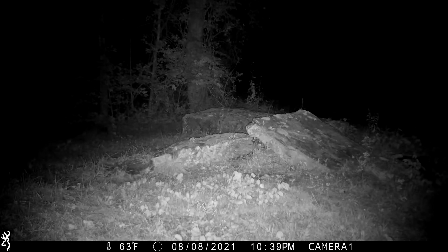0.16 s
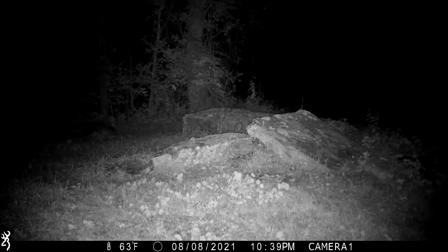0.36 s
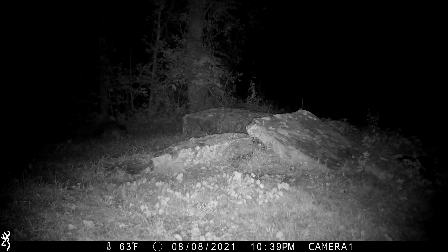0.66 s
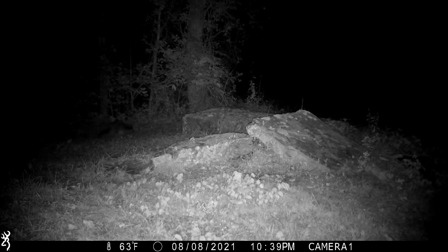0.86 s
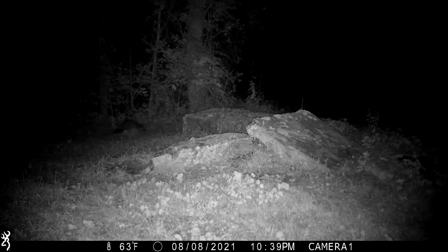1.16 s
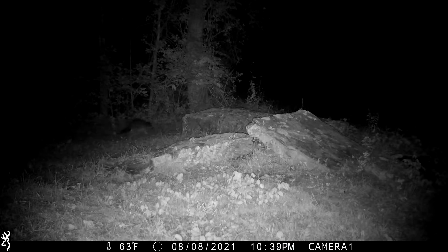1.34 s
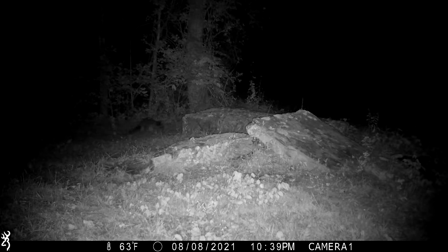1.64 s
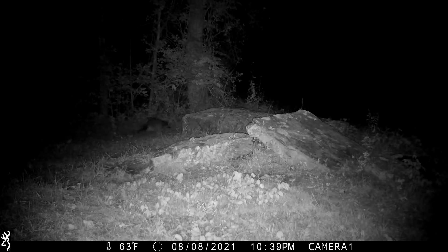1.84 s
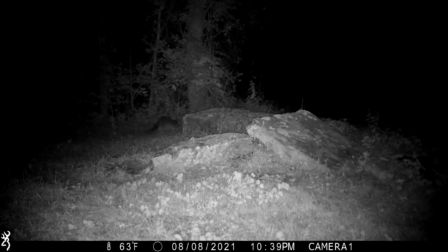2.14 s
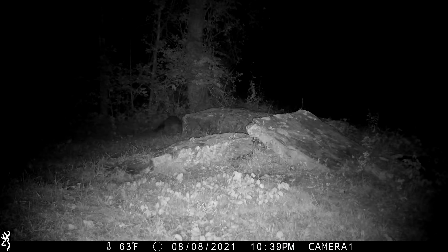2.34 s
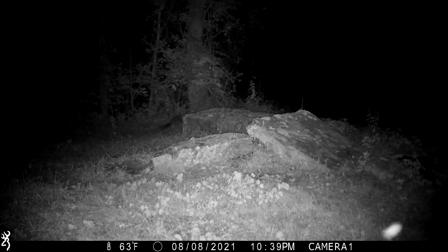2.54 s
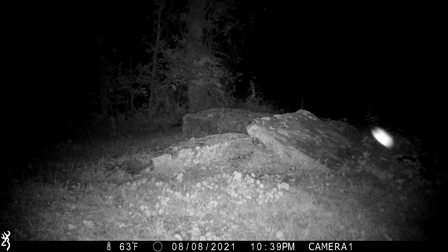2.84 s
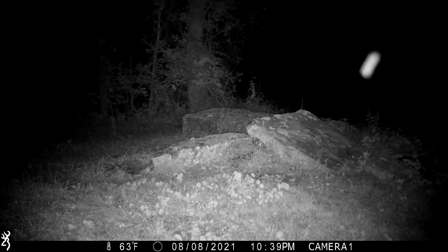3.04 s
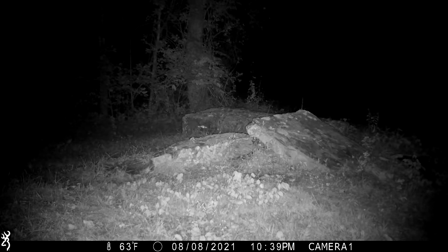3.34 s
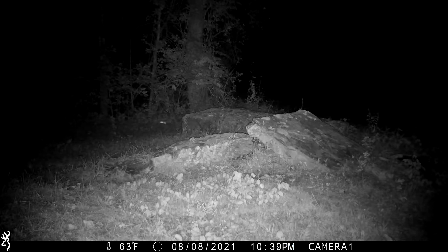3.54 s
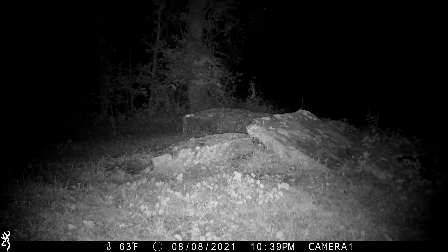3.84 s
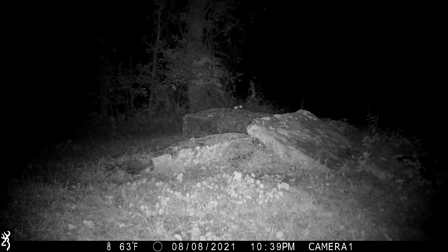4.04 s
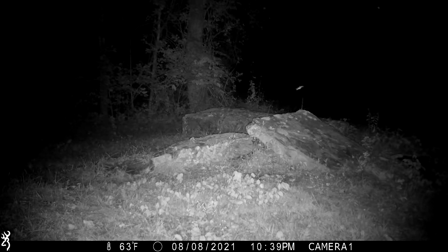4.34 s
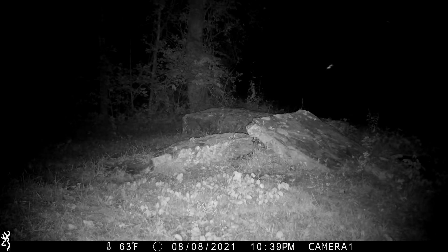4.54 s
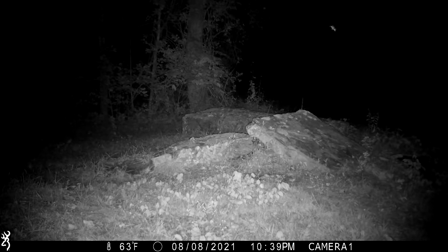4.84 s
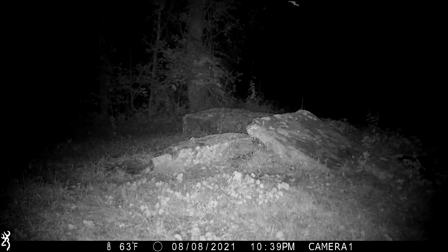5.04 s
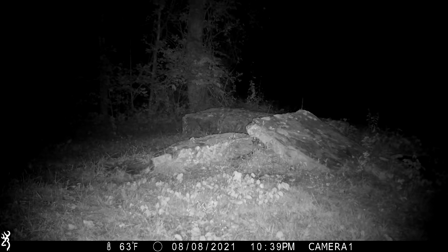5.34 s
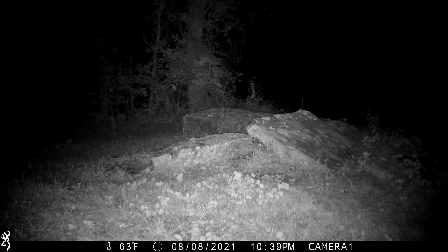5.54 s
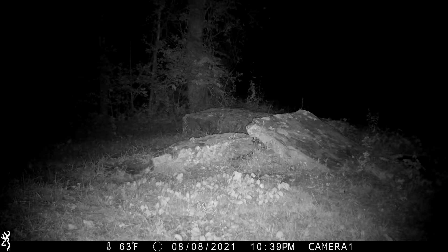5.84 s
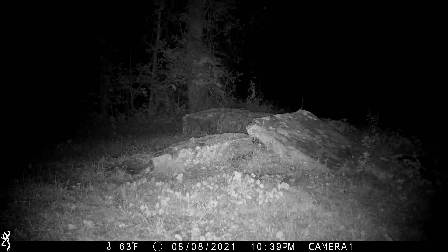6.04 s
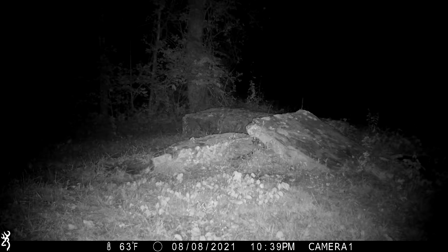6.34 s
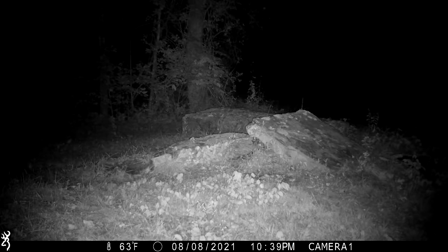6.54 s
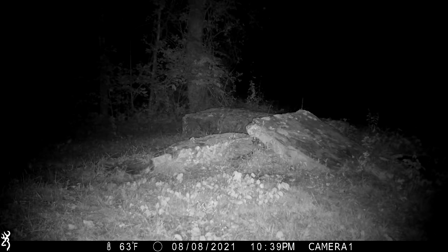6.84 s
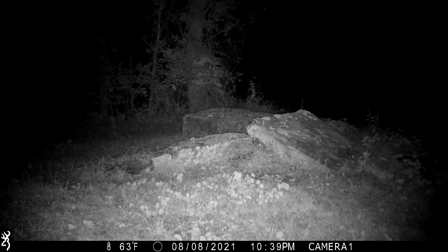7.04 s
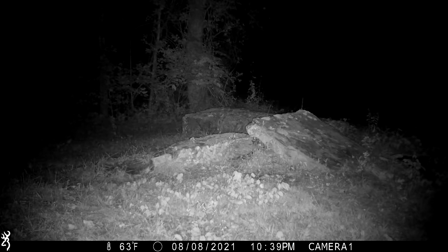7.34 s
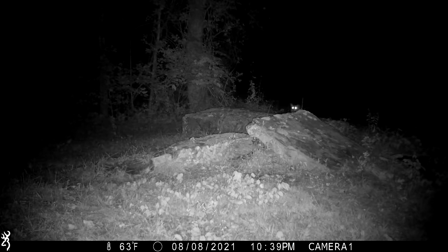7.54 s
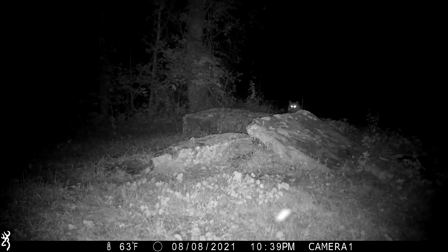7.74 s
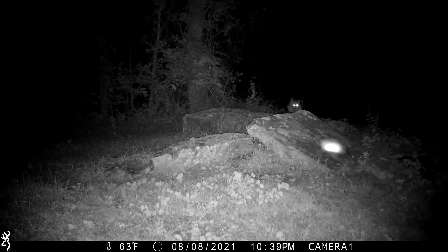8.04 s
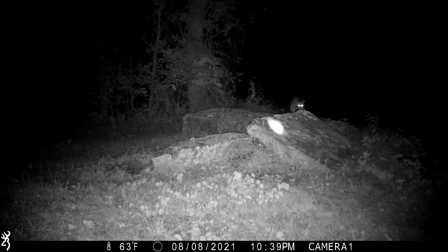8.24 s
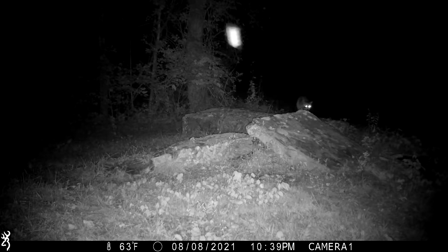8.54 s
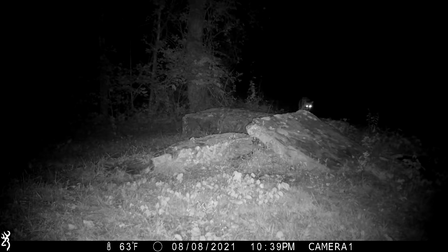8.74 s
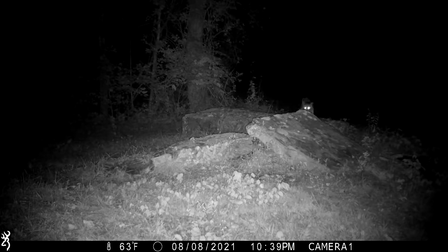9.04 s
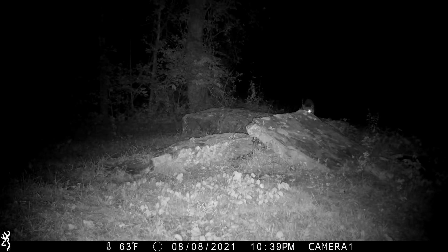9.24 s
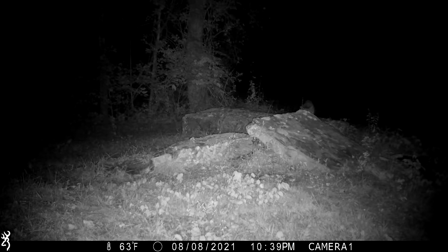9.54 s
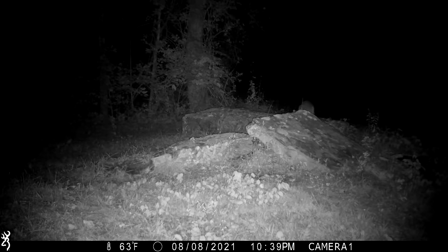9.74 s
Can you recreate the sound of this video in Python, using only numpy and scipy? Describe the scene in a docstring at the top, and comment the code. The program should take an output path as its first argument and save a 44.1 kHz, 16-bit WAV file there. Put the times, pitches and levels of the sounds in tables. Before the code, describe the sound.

Crowds of katydids rasp in pulsing waves through a dark summer wood, over steady tree cricket trills and soft microphone hiss.

```python
"""A summer night in a wood, heard by a small trail camera.
From the start, crowds of katydids rasp in the treetops in waves, about five in four seconds.
A few nearer ones stand out in short runs of rasps, made of clicks as a wing scrapes along a file.
Tree crickets trill steadily beneath, as short tones that sag in pitch; the camera hisses and faintly whines.
From 1.6 s one distant cricket comes forward in bouts, as a thin, wavering note."""
import sys
import numpy as np
from scipy import signal
from scipy.fft import rfft, irfft, next_fast_len
from scipy.io import wavfile
from scipy.ndimage import map_coordinates

SR = 44100
rng = np.random.default_rng(int(sys.argv[2]) if len(sys.argv) > 2 else 0)


def to_wav(s):
    """Save 16-bit WAV."""
    ch = np.atleast_2d(s).T  # columns
    pcm = np.round(np.clip(ch, -1, 1) * 32767)  # PCM
    wavfile.write(sys.argv[1], SR, pcm.astype(np.int16))


N = 436149
TIME = np.arange(N) / SR  # seconds


def chorus():
    """Two crowds of katydids swell and sink together, blurred by the wood; the far one is duller."""
    # how strong each pitch is in the near and the far crowd: (frequency [Hz], level per Hz [dB])
    near_colour = [(1100, -40.5), (1450, -14), (2100, -4), (2550, -5), (3100, 1.5), (3400, -1.5),
                   (3900, -10), (4400, -9.5), (4850, -8.5), (5350, -12.5), (6000, -26), (6500, -36.5),
                   (7100, -50), (8000, -84)]
    far_colour = [(1000, -50), (1250, -21.5), (1500, -11.5), (1750, -10.5), (2000, -0.5), (2250, 0.5),
                  (2550, -3.5), (2900, -8.5), (3400, -13), (3900, -20), (5000, -16), (6000, -34),
                  (7000, -69)]

    near = katydids(count=700, rasps_per_s=7.8, length=.07, teeth_per_s=520, spread_db=6.5)
    far = katydids(count=800, rasps_per_s=9, length=.07, teeth_per_s=480, spread_db=5.0)

    near = unit(colour(woods(near, wet=1.6, t60=.45), near_colour))
    far = unit(colour(woods(far, wet=2, t60=.35), far_colour))

    near = near * level(lull_db=-47.5, wave_db=0, lag=0)
    far = far * level(lull_db=-44.5, wave_db=-1.0, lag=.02)  # weaker, later waves
    return wings(near + far, depth_db=1.0, width_hz=35, hold=.3)


def katydids(count, rasps_per_s, length, teeth_per_s, spread_db):
    """A crowd of callers take turns, each giving a run of three rasps at its own pace and distance."""
    clicks = np.zeros(N)
    for turn, (delay, pace, teeth, nearness) in enumerate(rng.random((count, 4))):
        start = (turn + delay) / count * (N / SR + 1) - .5  # some turns begin before the scene does
        gap = 1 / (rasps_per_s * (.85 + .3 * pace))
        own_teeth_per_s = teeth_per_s * (.7 + .6 * teeth)
        gain = amp(spread_db * nearness)
        for k in range(3):
            at, size = rasp(clicks, start + k * gap, length, own_teeth_per_s, gain)
            clicks[at] += size
    return clicks


def rasp(track, middle, length, teeth_per_s, gain):
    """One wing stroke: a scraper clicks along the file; returns the click places and sizes."""
    tooth_gaps = 1 + .15 * rng.standard_normal(128)  # slightly uneven teeth
    since_start = np.cumsum(tooth_gaps) / teeth_per_s

    # the stroke swells and fades; clicks that come less often are made bigger
    swell = np.sqrt(np.sin(np.pi * np.clip(since_start / length, 0, 1)).clip(0))
    size = swell * np.sqrt(SR / teeth_per_s)

    at = np.round((middle - length / 2 + since_start) * SR).astype(int)
    inside = (at >= 0) * (at < len(track))
    return at.clip(0, len(track) - 1), gain * size * inside


def level(lull_db, wave_db, lag):
    """A crowd's gain at every sample: some always call, and the rest join in and drop out with each wave."""
    # waves of the katydid chorus: (time of the crest [s], length [s], level [dB])
    waves = [(.12, 1.4, -42.5), (1.08, 1.15, -42.5), (1.84, 0.92, -42.5), (2.652, 0.81, -41.5),
             (3.49, 0.78, -41), (4.272, 0.8, -41.5), (5.06, 1.04, -43.5), (5.743, 0.87, -43.5),
             (6.41, 0.92, -42), (7.12, 1.15, -45), (7.9, 1.36, -43), (8.677, 0.88, -41), (9.58, 1.9, -44)]

    power = np.full(N, amp(lull_db) ** 2)
    for crest, length, db in waves:
        phase = np.clip((TIME - crest - lag) / length, -.5, .5)
        power += (amp(db + wave_db) * np.cos(np.pi * phase)) ** 2
    return np.sqrt(power)


def near_katydids():
    """The closest callers, whose single rasps can be told apart."""
    # runs of evenly spaced rasps: (time of first rasp [s], rasps [count], time between rasps [s], level [dB])
    runs = [(.095, 1, .12, -44), (.877, 3, .12, -45.5), (1.745, 3, .141, -49), (2.89, 4, .119, -42),
            (4.825, 3, .112, -41), (5.374, 3, .109, -43), (6.408, 2, .193, -43.5), (6.758, 3, .126, -43),
            (7.276, 2, .115, -46), (7.778, 2, .119, -46.5), (8.093, 3, .119, -46), (9.287, 1, .12, -46),
            (9.595, 3, .12, -47)]
    # how strong each pitch is in a near rasp: (frequency [Hz], level per Hz [dB])
    rasp_colour = [(1100, -40.5), (1500, -9.5), (1800, -6), (2150, -1), (2600, -1.5), (3200, -1),
                   (3900, -7.5), (4850, -8.5), (5400, -16.5), (6000, -23), (7100, -51.5), (8000, -86.5)]
    length_s, mean_teeth_per_s = .065, 600
    lead_s = .008  # a stroke peaks slightly before its echoes do

    clicks = np.zeros(N)
    for (first, count, gap, db), teeth in zip(runs, rng.uniform(.8, 1.2, len(runs))):
        for k in range(round(count)):
            middle = first + k * gap - lead_s
            at, size = rasp(clicks, middle, length_s, mean_teeth_per_s * teeth, amp(db))
            clicks[at] += size
    return colour(woods(clicks, wet=1.0, t60=0.14), rasp_colour)


def woods(clicks, wet, t60):
    """Direct clicks plus their echoes; every caller has its own paths among the trunks, so they merge into a haze."""
    keep = amp(-120 / (t60 * SR))  # share of the echo energy left after one sample: 60 dB down in t60 seconds
    already_ringing = [np.mean(clicks ** 2)]
    energy = signal.lfilter([1 - keep], [1, -keep], clicks ** 2, zi=already_ringing)[0]
    haze = np.sqrt(energy) * rng.standard_normal(N)
    return (clicks + wet * haze) / np.sqrt(1 + wet ** 2)


def wings(x, depth_db, width_hz, hold):
    """Each caller's wings ring at their own narrow pitches, which stand out for the length of its call."""
    hz, t, spectrum = signal.stft(x, SR, nperseg=2048)
    field = rng.standard_normal((1024, 256))  # chance boosts and cuts over pitch and time
    places = np.meshgrid(hz / width_hz, t / hold, indexing="ij")
    rings = map_coordinates(field, places, order=1, mode="wrap")
    return signal.istft(spectrum * amp(depth_db * unit(rings)), SR, nperseg=2048)[1][:N]


def tree_crickets():
    """Each wing stroke is a short tone that sags in pitch; the strokes run on as a trill."""
    # one row a cricket, each value wavering a little: (pitch [Hz], wing strokes [per s], level [dB])
    crickets = [(2700, 43, -53), (2721, 54.5, -53), (2774, 30, -56), (2826, 51, -52.5), (2852, 42, -55.5)]

    trills = np.zeros(N)
    for hz, strokes_per_s, db in crickets:
        stroke = np.cumsum(strokes_per_s * (1 + .02 * drift(4))) / SR % 1  # 0 to 1 through each stroke
        pitch = hz * (1 + .008 * drift(40) - 0.033 * (stroke - .5))
        tone = np.sin(2 * np.pi * np.cumsum(pitch) / SR)
        trill = np.sin(np.pi * stroke) ** 2 * tone
        gain = amp(db + 1.2 * drift(2.5))
        trills += gain * unit(echoes(trill, wet=0.95, t60=.4))
    return trills


def echoes(x, wet, t60):
    """Direct sound plus a dying scatter of echoes along one caller's own paths."""
    t = TIME[:SR // 2]
    arrives = rng.random(len(t)) < 2000 / SR  # about 2000 echoes a second
    taps = rng.standard_normal(len(t)) * arrives * amp(-60 * t / t60)
    return x + wet * signal.oaconvolve(x, taps / np.linalg.norm(taps))[:N]


def pure_cricket():
    """A distant trill in bouts, smoothed into one thin wavering note."""
    # bouts of the clean note: (start time [s], length [s], level [dB])
    bouts = [(1.6, 1.8, -55.5), (4.2, 1.5, -57), (5.75, 1.05, -54), (8.4, 1.7, -56)]
    middle_hz, rest_db = 2617, -64.5  # it barely sounds between bouts
    fade_s = .12  # it eases in and out

    gain = np.full(N, amp(rest_db))
    for start, length, db in bouts:
        inside = np.minimum(TIME - start, start + length - TIME)  # seconds from the nearer end
        gain = np.maximum(gain, amp(db) * np.clip(inside / fade_s, 0, 1))

    pitch = middle_hz + 1.8 * drift(12)
    note = unit(np.sin(2 * np.pi * np.cumsum(pitch) / SR))
    return gain * amp(2.0 * drift(22)) * note


def camera():
    """Steady hiss of the air and the microphone, and an electronic whine whose phase flips with every picture frame."""
    # how strong each pitch is in the hiss: (frequency [Hz], level per Hz [dB])
    hiss_colour = [(20, -23), (60, -13.5), (130, -7.5), (300, -3.5), (600, 0.5), (1200, 0), (3000, -2.5),
                   (5000, -11), (6500, -30), (7400, -39.5), (15500, -38.5)]
    whine_hz, frames_per_s = 7796.3, 59.53

    hiss = amp(-56) * colour(rng.standard_normal(N), hiss_colour)
    flips = np.tanh(40 * np.sin(np.pi * frames_per_s * TIME))  # quick swaps between +1 and -1
    whine = unit(flips * np.sin(2 * np.pi * whine_hz * TIME))
    return hiss + amp(-83.0) * whine


def colour(x, points):
    """Filters by a (Hz, dB) spectrum; white input keeps its power."""
    size = next_fast_len(N)
    hz, db = np.transpose(points)
    bins_hz = np.fft.rfftfreq(size, 1 / SR)
    gain = amp(np.interp(np.log(bins_hz + 1), np.log(hz), db))
    return irfft(rfft(x, size) * unit(gain), size)[:N]


def drift(per_s):
    """Slow chance wandering of rms 1, with a new turn per_s times a second."""
    knots = rng.standard_normal(2048)
    return unit(np.interp(TIME * per_s, np.arange(len(knots)), knots))


def amp(db):
    """Decibels to gain."""
    return 10 ** (np.asarray(db) / 20)


def unit(x):
    """Scales to an rms (average strength) of 1."""
    return x / np.sqrt(np.mean(x ** 2) + 1e-20)


def scene():
    """All the insects and the camera's own noise, in one channel."""
    insects = chorus() + near_katydids() + tree_crickets() + pure_cricket()
    return (insects + camera())[None]


def record(dry):
    """The recorder's band limit: a steep filter takes away what lies above its edge."""
    edge_hz = 15750
    lowpass = signal.firwin(511, edge_hz, window=("kaiser", 9), fs=SR)
    return signal.oaconvolve(dry, lowpass[None], "same")


dry = scene()
out = record(dry)
to_wav(out)
```